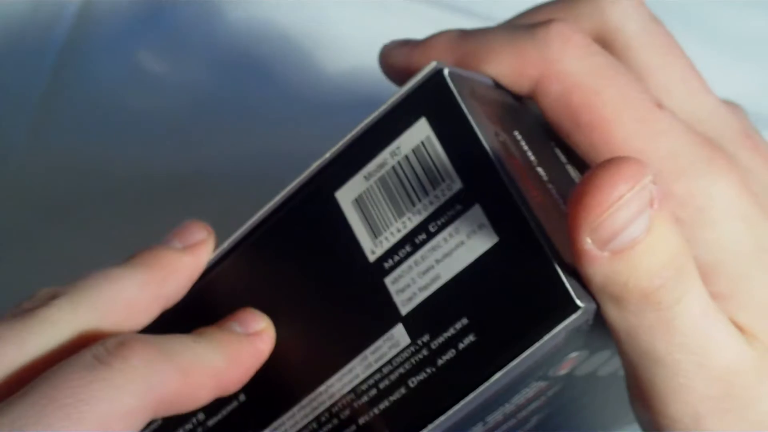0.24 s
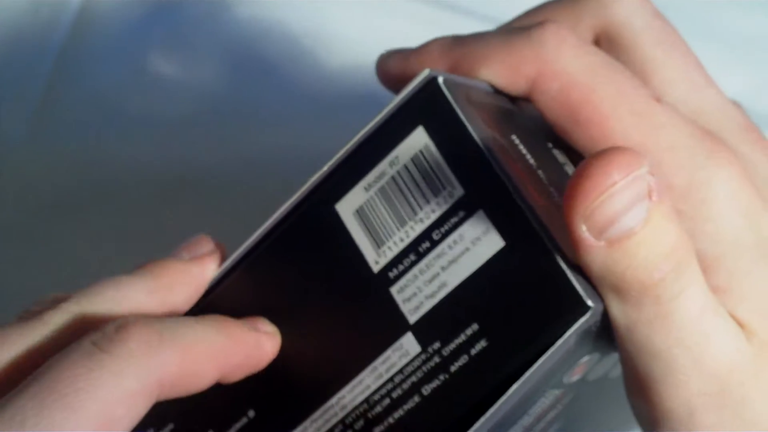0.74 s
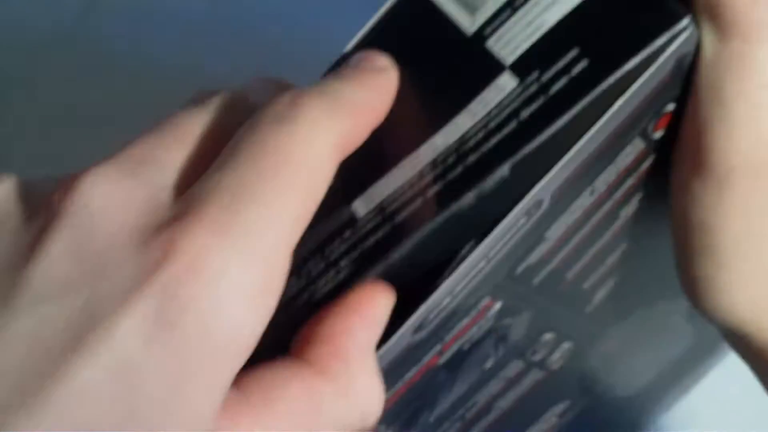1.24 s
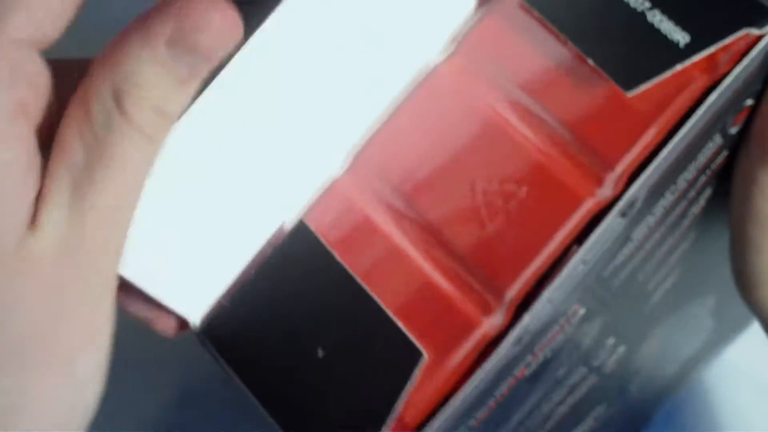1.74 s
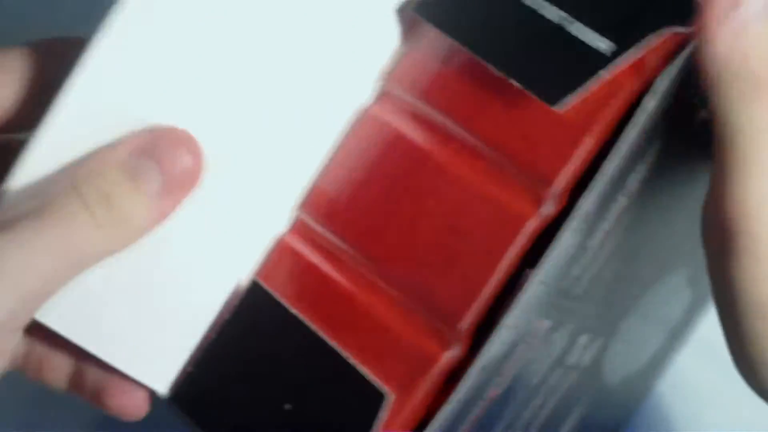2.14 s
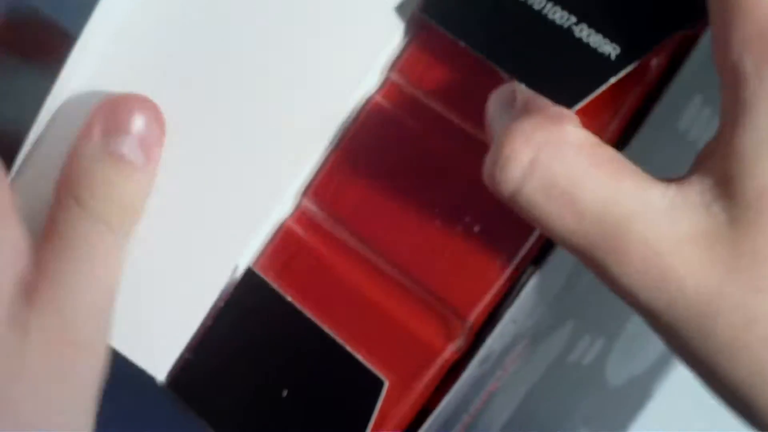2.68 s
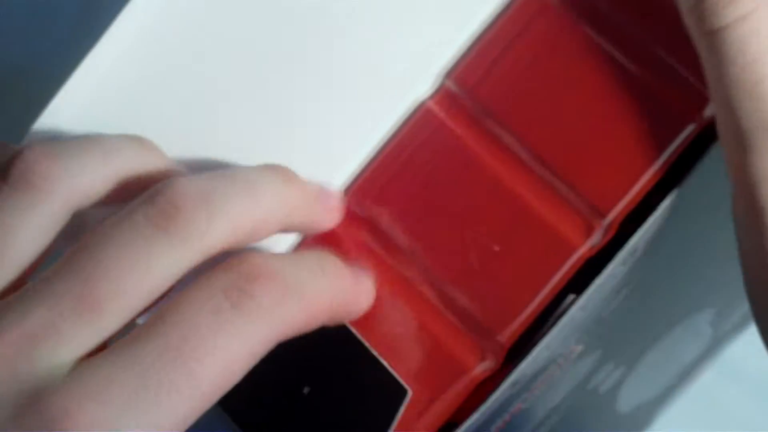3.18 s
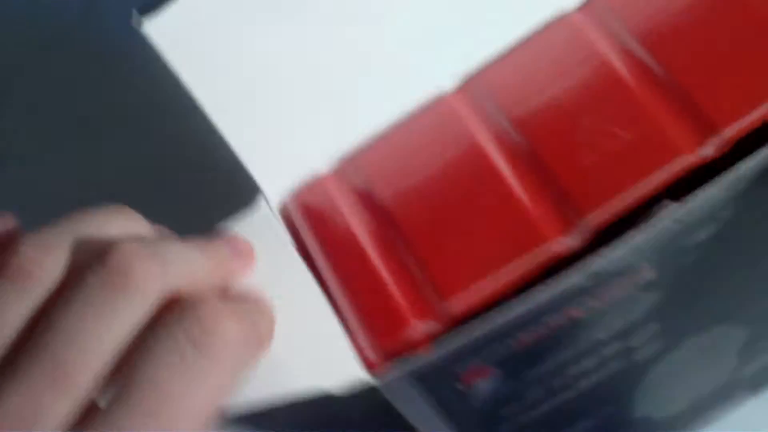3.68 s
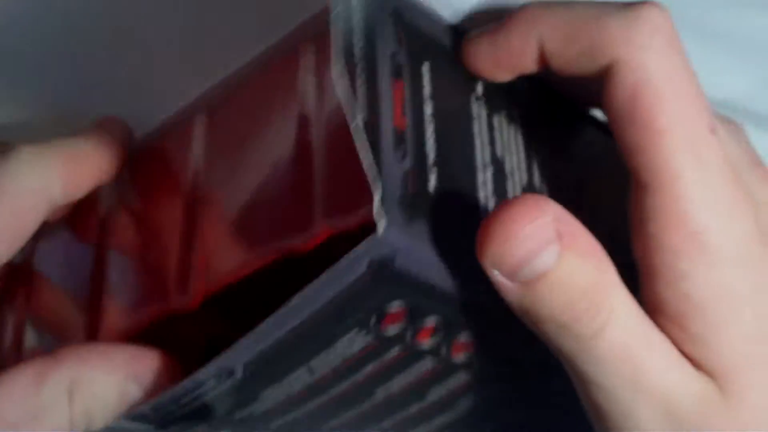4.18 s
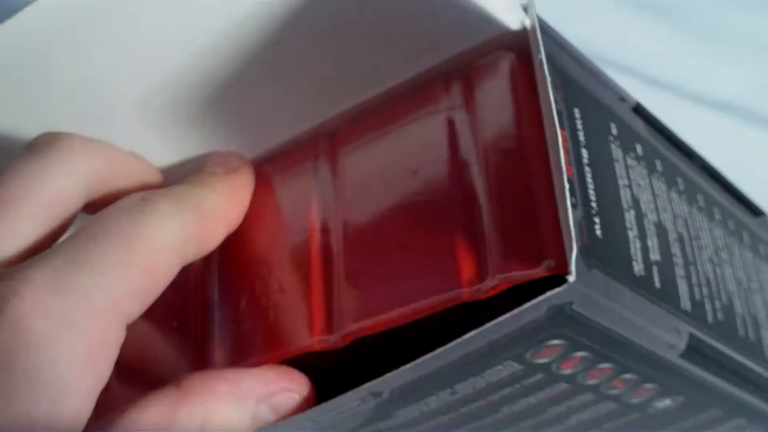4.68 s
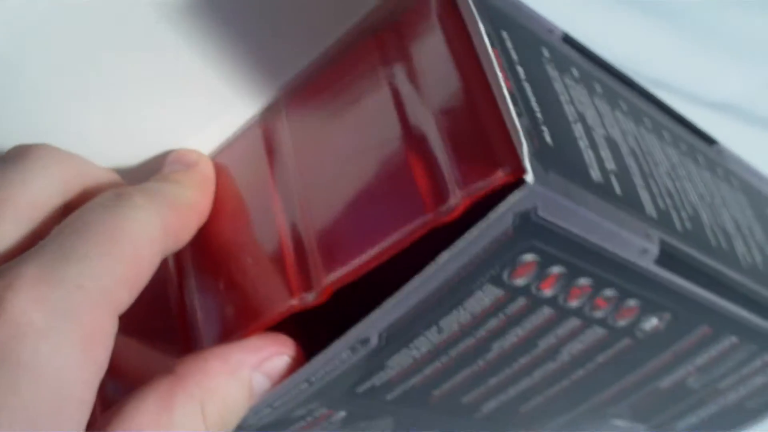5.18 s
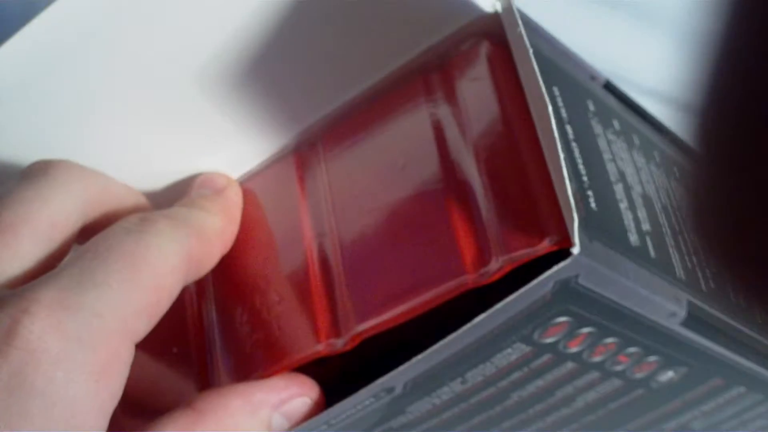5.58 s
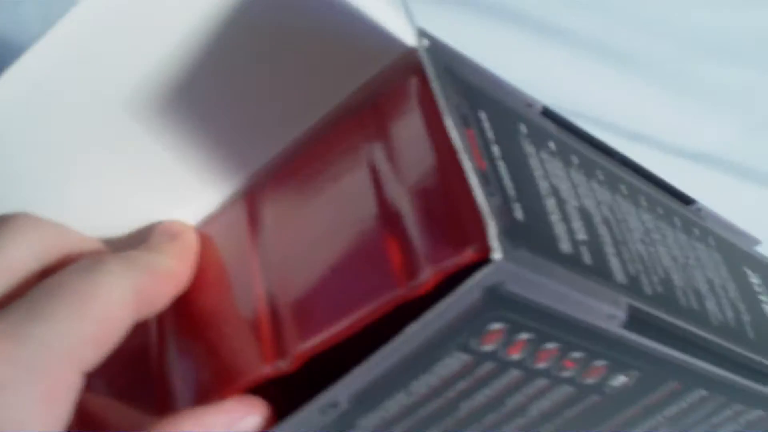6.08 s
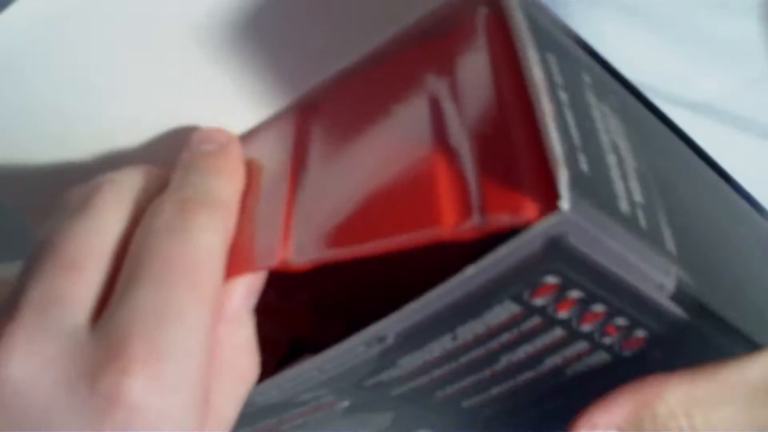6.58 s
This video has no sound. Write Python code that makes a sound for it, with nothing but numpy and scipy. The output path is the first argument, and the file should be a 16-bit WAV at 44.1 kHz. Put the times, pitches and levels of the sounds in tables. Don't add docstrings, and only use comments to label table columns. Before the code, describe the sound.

A quiet room with a faint bassy hum, heard by a small microphone very close to a cardboard box. From 0 to 1.1 s fingers rub softly, with hollow knocks near 0.45 and 0.6. At 1.25 a cluster of knocks and rough brushing begins; at 1.44 the flap slips free with a strong tick, thump and air puff. Around 2.1 comes a run of crisp crease ticks, a sharp click at 2.46, then presses, scrapes and puffs near 2.9. Between 3.4 and 3.6 there are knocks and a short glossy squeak; handling at 4.0 to 4.3 rasps and knocks. It calms until tiny plastic pops start at 5.0, growing at 5.5 and 5.9. Crackles lead to a hard pop at 6.07 and a hugely loud, dry, distorted snap at 6.11. Smaller pops follow at 6.3, fading to light crackles at 6.75 to 6.83.

```python
import sys
import numpy as np
from scipy import signal
from scipy.fft import rfft, irfft, next_fast_len
from scipy.io import wavfile
from scipy.ndimage import uniform_filter1d, map_coordinates

SR = 44100
rng = np.random.default_rng(int(sys.argv[2]) if len(sys.argv) > 2 else 0)


def int16_out(signal):
    q = np.round(np.clip(np.atleast_2d(signal).T, -1, 1) * 32767)
    wavfile.write(sys.argv[1], SR, q.astype(np.int16))


def linear_from_db(decibels):
    return 10 ** (np.asarray(decibels, float) / 20)


N = 301423

# [f/Hz, width/Hz, level/dB]
PANEL_MODES = [(60, 98, -1.5), (189, 140, -1), (354, 120, -2)]
# [f/Hz, width/Hz, level/dB]
EDGE_MODES = [(2250, 626, -0.5), (3670, 700, -4), (5060, 1300, -4)]
# [f/Hz, width/Hz, level/dB]
CRISP_MODES = [(6600, 1400, -1.5), (9750, 1400, 1.5), (13300, 2500, -10)]


def unit(x):
    return x / np.sqrt(np.mean(x ** 2) + 1e-20)


def along(points, hz):
    f, value = np.transpose(points)
    return np.interp(np.log(hz + 1), np.log(f + 1), value)


def filtered(x, response):
    length = x.shape[-1]
    size = next_fast_len(length + 4096)
    spectrum = rfft(x, size) * response(np.fft.rfftfreq(size, 1 / SR))
    return irfft(spectrum, size)[..., :length]


def peak(f, hz, width):
    return 1j * f * width / (hz * hz - f * f + 1j * f * width)


def body(modes):
    return lambda f: sum((-1) ** k * linear_from_db(db) * peak(f, hz, width) for k, (hz, width, db) in enumerate(modes))


def add(track, s, sound):
    part = track[round(s * SR):][:len(sound)]
    part += sound[:len(part)]


def room_air():
    # [f/Hz, density/dB per Hz]
    air_colour = [(12, -30), (20, -1), (86, -6.5), (187, -17.5), (357, -16), (388, -26.5), (472, -12),
                  (574, -17), (1480, -19), (2260, -22.5), (7730, -28.5), (13900, -32.5), (16000, -49.5)]
    return linear_from_db(-67) * unit(filtered(rng.standard_normal(N), lambda f: linear_from_db(along(air_colour, f))))


def room(x):
    # [f/Hz, t60/s]
    decay = [(200, 0.13), (900, 0.2), (4000, 0.099), (12000, 0.05)]
    hz, t, z = signal.stft(rng.standard_normal(SR // 3), SR, nperseg=256)
    fading = z * linear_from_db(-60 * t / along(decay, hz)[:, None])
    tail = signal.istft(fading, SR, nperseg=256)[1]
    delayed = np.pad(x, (200, 0))
    return signal.fftconvolve(delayed, tail / np.linalg.norm(tail))[:N]


def puffs():
    # [t/s, peak level/dB]
    puff_events = [
        (1.439, -38),
        (2.079, -58),
        (2.72, -52),
        (2.94, -41),
        (3.017, -47),
        (3.999, -50),
        (6.106, -40),
        (6.3, -54.5),
        (6.375, -54),
        (6.82, -44.5),
    ]
    u = np.arange(SR // 8) / SR / 0.0031
    track = np.zeros(N)
    for s, db in puff_events:
        add(track, s, linear_from_db(db + 6.5) * u * (2 - u) * np.exp(-u))
    return track


def creak():
    swell = np.exp(-((np.arange(N) / SR - .25) / 0.096) ** 2)

    def notes_of_box(f):
        return peak(f, 773, 32) ** 2 + linear_from_db(-9) * peak(f, 1143, 90) ** 2 + linear_from_db(-5) * peak(f, 375, 50) ** 2

    return linear_from_db(-61.5) * swell * unit(filtered(rng.standard_normal(N), notes_of_box))


def grit(per_s, spread_db, smooth):
    happens = rng.random(N) < per_s / SR
    size = linear_from_db(spread_db * np.minimum(rng.exponential(size=N), 3))
    slips = happens * size * rng.choice([-1, 1], N)
    clumps = map_coordinates(rng.standard_normal(400), [np.arange(N) * 45 / SR])
    return linear_from_db(2.5 * clumps) * (unit(slips) + smooth * rng.standard_normal(N))


def shares(pressure_db, speed_db):
    rest_db = -64
    over = pressure_db - rest_db
    panel = -3.5 + 0.42 * over
    hiss = -5 + 0.63 * over + speed_db
    return linear_from_db(rest_db + np.array([over, panel, over + speed_db, hiss]))


def rubbing():
    # [t/s, pressure level/dB, speed level/dB]
    grip = [(0, -54.5, -15), (.13, -67.5, -6), (.3, -66.5, -11), (.68, -63.5, -8), (.88, -73, -5),
            (1.2, -60, -5), (1.65, -75, -6), (2.05, -61, -8.5), (2.65, -65.5, -7.5), (3.25, -66, -5.5),
            (3.7, -70.5, 0), (4.33, -57.5, -9.5), (4.6, -69, -7.5), (5.12, -71.5, -6.5), (5.4, -70.5, -12),
            (5.9, -70, -6), (6.6, -70, -8.5), (6.83, -55, -12)]
    # [t/s, swell/s, fade/s, pressure level/dB, speed level/dB]
    strokes = [(1.27, 0.0054, 0.051, -47, -3), (1.41, 0.044, 0.15, -46, -5.5),
               (2.19, 0.051, 0.04, -56.5, 0), (2.48, 0.031, 0.038, -53, -8), (2.75, 0.042, 0.035, -50, -13),
               (2.89, 0.023, 0.036, -50.5, -2), (2.955, 0.011, 0.035, -51.5, -8.5),
               (3.04, 0.048, 0.053, -55.5, -13), (3.46, 0.077, 0.22, -56.5, -20),
               (3.82, 0.035, 0.074, -56, -12), (4.012, 0.0071, 0.037, -53, -9),
               (4.225, 0.013, 0.013, -47, -9), (4.287, .005, 0.0075, -46, -14),
               (4.75, 0.073, 0.033, -69.5, -24), (5.37, 0.034, 0.039, -69, -13),
               (6.08, 0.063, 0.02, -57, -2), (6.2, 0.056, 0.021, -59, -16),
               (6.31, 0.027, 0.032, -45, -28.5)]
    # [f/Hz, width/Hz, level/dB]
    cavity_modes = [(392, 210, -2.5), (861, 210, -.5), (1240, 340, -5.5)]
    panel_wakes_s = .06
    t = np.arange(N) / SR
    s, pressure_db, speed_db = np.transpose(grip)
    gains = shares(np.interp(t, s, pressure_db), np.interp(t, s, speed_db))
    for s, swell, fade, db, speed_db in strokes:
        gain = shares(db, speed_db) * [1, min(fade / panel_wakes_s, 1), 1, 1]
        shape = np.exp(-np.abs(t - s) / np.where(t < s, swell, fade))
        gains = gains + gain[:, None] * shape
    cavity, panel, rasp, hiss = gains
    mix = cavity * unit(filtered(grit(900, 1.9, 0.91), body(cavity_modes)))
    mix += panel * unit(filtered(grit(340, 2.6, 0.65), lambda f: body(PANEL_MODES)(f) * peak(f, 180, 530)))
    mix += rasp * unit(filtered(grit(1400, 3, .8), lambda f: body(EDGE_MODES)(f) * peak(f, 2000, 5500)))
    mix += hiss * unit(filtered(grit(2400, 2.8, 1.2),
                                lambda f: body(CRISP_MODES)(f) + linear_from_db(-9.5) * peak(f, 9000, 9000)))
    return mix


def rasps(rows, focus):
    t, track = np.arange(N) / SR, np.zeros(N)
    drive = grit(1500, 3, 0.9)
    for s, swell, fade, db, hz in rows:
        span = slice(round((s - .2) * SR), round((s + .3) * SR))
        since = t[span] - s
        shape = np.exp(-(since / np.where(since < 0, swell, fade)) ** 2)

        def colour(f):
            return peak(f, hz, focus * hz) ** 2 + linear_from_db(-14) * peak(f, hz, 1.1 * hz) * peak(f, hz, 3 * hz)

        track[span] += linear_from_db(db) * shape * unit(filtered(drive[span], colour))
    return track


def brushes():
    # [t/s, swell/s, fade/s, level/dB,
    # centre f/Hz]
    card_brushes = [(1.256, 0.0048, 0.013, -37.5, 1730), (1.257, 0.0044, 0.02, -41, 6700),
                    (1.268, 0.011, 0.022, -41, 4700), (1.278, .012, 0.05, -55.5, 3700),
                    (1.385, 0.038, 0.035, -52.5, 900), (1.485, 0.023, 0.035, -50, 710),
                    (1.49, .03, 0.043, -52, 1930), (1.48, 0.017, 0.02, -57, 6500),
                    (1.27, .01, 0.055, -44, 850), (1.31, 0.018, .03, -53, 2270),
                    (1.40, 0.085, 0.05, -51, 1800), (1.47, .015, 0.048, -49, 4700),
                    (1.67, .01, .06, -66.5, 2380), (2.15, 0.044, .08, -60, 6500),
                    (2.21, .03, .03, -62, 9500), (2.485, .015, 0.028, -61, 6000),
                    (2.62, 0.016, .03, -62, 8000), (2.9, 0.036, 0.02, -53, 900),
                    (2.96, .015, .02, -63, 2300), (2.962, .012, 0.02, -46, 760),
                    (3.11, .01, 0.036, -60, 1400), (1.912, 0.013, 0.018, -56, 4300),
                    (2.47, 0.027, 0.043, -59, 1890), (2.735, 0.024, 0.024, -51.5, 1700),
                    (2.89, 0.017, 0.016, -57, 7900), (2.89, 0.017, .03, -59, 3180),
                    (3.035, 0.016, 0.017, -55, 1500), (3.03, .015, 0.13, -64, 4500),
                    (3.385, 0.013, 0.024, -54.5, 1860), (3.47, .02, 0.045, -67, 1900),
                    (3.53, 0.035, 0.043, -61, 1700), (3.56, 0.046, .03, -70, 8300),
                    (4.15, .03, .03, -61, 2200), (3.812, 0.02, 0.028, -61, 6900),
                    (4.22, 0.02, 0.025, -58, 6300), (4.095, 0.0084, 0.011, -44, 840),
                    (4.225, 0.018, 0.023, -51, 1900), (4.23, 0.026, 0.026, -46, 795),
                    (4.28, .012, 0.011, -56.5, 4570), (4.35, .04, .03, -60, 2000),
                    (4.43, 0.044, 0.044, -60, 910), (4.72, 0.13, 0.074, -66, 1290)]
    # [t/s, swell/s, fade/s,
    # level/dB, centre f/Hz]
    tray_drags = [(5.365, 0.03, 0.042, -62, 2040), (5.38, .035, .04, -60.5, 1100),
                  (5.482, .004, .005, -55, 1000), (5.83, 0.044, .02, -56, 1100),
                  (5.57, .04, 0.074, -65, 2070), (5.57, 0.06, 0.12, -60.5, 1200),
                  (6.062, 0.0015, 0.003, -33.5, 1150), (6.09, .03, .015, -62.5, 8500),
                  (6.117, .004, 0.013, -35, 900), (6.13, .01, .025, -50, 950),
                  (6.284, 0.0046, 0.0074, -46.5, 1053), (6.435, .005, .012, -53, 1040),
                  (6.75, .03, .04, -54, 900)]
    return rasps(card_brushes + tray_drags, focus=.33)


def squeaks():
    # [t/s, swell/s, fade/s, level/dB, centre f/Hz]
    squeak_events = [(1.925, 0.027, 0.033, -61, 5100), (2.885, 0.0087, .015, -58, 8100),
                     (3.505, .015, 0.033, -58, 5160), (3.562, 0.014, 0.032, -53.5, 4000),
                     (3.58, .025, 0.03, -58, 5050), (3.59, 0.017, .015, -65, 3300),
                     (.49, 0.021, 0.054, -58.5, 415)]
    return rasps(squeak_events, focus=.16)


def flicks():
    # [t/s, peak level/dB, f/Hz, t60/s]
    card_flicks = [(.012, -48.5, 950, 0.037), (.186, -51, 1190, .02), (.42, -54, 400, 0.035),
                   (0.61, -35, 820, 0.023), (1.265, -38, 850, 0.036), (1.452, -30, 4400, 0.013),
                   (1.658, -50, 2400, 0.017), (1.743, -52, 2320, .02), (1.857, -48, 3710, .014),
                   (1.911, -42, 2220, 0.045), (2.077, -41, 1790, .012), (2.096, -48, 6800, .01),
                   (2.316, -51, 1810, .015), (2.385, -49, 2160, .015), (2.464, -34, 5000, 0.011),
                   (2.499, -47, 2010, .02), (2.595, -42, 6550, .012), (2.69, -47, 500, 0.017),
                   (2.701, -46, 900, .015), (2.875, -38, 2350, 0.018), (2.876, -41, 3430, .02),
                   (2.941, -44, 6600, .012), (3.018, -39, 4100, .014), (3.025, -42, 4500, 0.012),
                   (3.159, -51, 5500, .012), (3.19, -53, 1600, 0.011), (3.403, -49, 5000, 0.017),
                   (3.454, -47, 2010, 0.028), (3.57, -36.5, 3900, .014), (3.52, -46, 500, .02),
                   (3.536, -47, 350, 0.017), (3.801, -41, 6500, 0.014), (3.63, -53, 5100, .012),
                   (3.65, -49, 5200, .015), (3.697, -51, 1310, .015), (3.774, -50, 1300, .02),
                   (3.775, -51, 8500, .015), (3.9, -50, 8500, .015), (3.99, -48, 2500, .008),
                   (4.19, -47, 2010, .012), (4.277, -35, 1000, .02), (4.39, -52, 8900, .008),
                   (4.64, -55, 750, .02), (4.736, -53, 2100, .012), (4.84, -59, 1400, 0.013),
                   (.453, -40, 396, 0.016), (3.362, -40.5, 1920, 0.007), (3.377, -37, 1810, 0.011)]
    # [t/s, peak level/dB, f/Hz, t60/s]
    tray_flicks = [(5.533, -53, 8000, .008), (5.545, -56, 8000, .008), (5.797, -36.5, 6600, 0.013),
                   (5.88, -28, 786, .022), (5.941, -58, 10400, .008), (6.303, -28.5, 1585, 0.0092),
                   (6.342, -57, 4500, 0.0093), (6.418, -48, 900, .02), (6.826, -42, 900, 0.022),
                   (6.826, -51, 5500, .015), (5.798, -37.5, 3830, 0.012), (6.185, -43, 1810, 0.012),
                   (6.1058, -27, 6400, .006), (6.1058, -44.5, 12000, .005), (6.106, -20, 2000, .008),
                   (6.117, -30.5, 1900, .012), (6.187, -39, 1050, .012)]
    s, db, hz, t60 = np.transpose(card_flicks + tray_flicks)[..., None]
    t, track = np.arange(SR // 16) / SR, np.zeros(N)
    burst = rng.standard_normal((len(s), len(t))) * linear_from_db(-60 * t / t60) * (1 - np.exp(-t / .0005))
    sounds = filtered(burst, lambda f: peak(f, hz, 0.25 * hz) ** 2 + linear_from_db(-13) * peak(f, hz, 1.3 * hz) ** 2)
    sounds = linear_from_db(db) * sounds / np.abs(sounds).max(1, keepdims=True)
    for start, sound in zip(s[:, 0], sounds):
        add(track, start - .0004, sound)
    return track


def thumps():
    # [t/s, peak level/dB, f/Hz]
    thump_events = [(0.457, -31.5, 400), (1.254, -32, 395), (1.437, -25.5, 338), (2.084, -35, 192),
                    (2.875, -36.5, 275), (3.019, -34, 216), (3.377, -42.5, 196), (3.566, -44, 340),
                    (6.068, -38, 370), (6.108, -28.5, 322), (6.2, -51, 280), (6.312, -33.5, 320),
                    (6.362, -34.5, 350), (6.374, -42.5, 340), (6.819, -53, 166)]
    t, track = np.arange(SR // 5) / SR, np.zeros(N)
    attack = 1 - np.exp(-t / 0.0023)
    for s, db, hz in thump_events:
        add(track, s, linear_from_db(db + 2.0 - 60 * t / 0.066) * attack * np.sin(2 * np.pi * hz * t))
    return track


def contacts(rows, width, burst, rise, edge):
    s, db, hz, thump_db, click_db, tick_db = np.transpose(rows)
    note = hz[:, None]
    t = np.arange(SR // 5) / SR

    def push(t60, rise):
        return rng.standard_normal((len(s), len(t))) * linear_from_db(-60 * t / t60) * (1 - np.exp(-t / rise)) ** 2

    def cavity(f):
        steep = peak(f, note, 1000) / (1 + 1j * f / 2500) ** 2
        return (peak(f, note, width) + 0.12) * steep

    hollow = filtered(push(.6 * burst, rise / 3), cavity)
    thump = filtered(push(2.0 * burst, rise), lambda f: body(PANEL_MODES[1:])(f) * peak(f, 320, 420))
    click = filtered(push(1.1 * burst, rise), lambda f: body(edge)(f) * peak(f, 3000, 5500) ** 2)
    tick = filtered(push(0.4 * burst, rise), lambda f: body(CRISP_MODES)(f) * peak(f, 9000, 8000))
    parts = [(0, hollow), (thump_db + 0.1, thump), (click_db + 0.1, click), (tick_db + 0.1, tick)]
    sounds = sum(linear_from_db(db + rel)[:, None] * p / np.abs(p).max(1, keepdims=True) for rel, p in parts)
    track = np.zeros(N)
    for start, sound in zip(s, sounds):
        add(track, start - .0011, sound)
    return track


def card_contacts():
    # [t/s, peak level/dB, cavity f/Hz, panel level/dB, edge click level/dB]
    knocks = [(.079, -59, 770, -3, 1), (.453, -35.5, 1100, -3, -9), (.46, -28.5, 770, -13, -20),
              (.609, -39, 785, -1.5, -35), (.992, -43.5, 780, -10, -7), (1.004, -49, 820, -9, -4),
              (1.26, -29, 850, -5.5, 0.5), (1.285, -23, 810, -34, -5.5), (1.311, -35, 890, -17, 1.5),
              (1.714, -51.5, 1310, -10, -3), (2.746, -38, 886, -21, -21), (2.8485, -37, 1310, -9, -6.5),
              (2.944, -28.5, 750, -30, -19), (3.026, -43.5, 800, 1, 3.5), (3.361, -39, 1100, -10, -18),
              (3.393, -36, 890, -15, -10), (3.454, -44.5, 910, -20, -11), (3.5, -41.5, 869, -10, -9),
              (3.848, -45, 870, -10, -8), (3.99, -45.5, 700, -5, -17), (4.082, -34.5, 787, -17, -6.5),
              (4.241, -35, 790, -31, -17), (4.283, -35.5, 840, -29, -14), (4.508, -50.5, 700, -20, -2)]
    # [t/s, peak level/dB, sharpness level/dB]
    presses = [(1.183, -47.5, -3), (1.251, -29.5, -13), (1.434, -30, -13), (2.055, -45, -4),
               (2.077, -45.5, -13), (2.084, -46, -9), (2.095, -50, -5), (2.269, -45, -22), (2.714, -44, -3),
               (2.879, -35.5, -7), (2.937, -39, -1), (3.018, -47.5, -9), (3.098, -46, -8),
               (3.14, -49.5, -3), (3.161, -59, 1), (3.192, -58, -18), (3.242, -52, 2), (3.571, -47.5, -7),
               (3.629, -47, -5), (3.801, -44.5, -1), (4.008, -45.5, 4)]
    # [t/s, peak level/dB, sharpness level/dB]
    ticks = [(.582, -50, -8), (1.053, -50, 0), (1.072, -57, 1), (1.099, -49.5, -5), (1.12, -58, 5),
             (1.157, -52, 0), (1.44, -18, -12.5), (1.453, -19.5, -11), (1.66, -53.5, -9), (1.83, -47, 0.5),
             (1.858, -43.5, -9), (1.913, -48, -6), (2.111, -41, 9), (2.1145, -44, 13), (2.1435, -40, 5),
             (2.1665, -38, 10.5), (2.181, -42.5, 2), (2.194, -40.5, 9.5), (2.379, -55.5, 1.5),
             (2.451, -46, -3), (2.465, -33.5, -15), (2.489, -37, -19), (2.549, -45.5, 3), (2.597, -38, -2),
             (2.954, -45, -3), (3.376, -35.5, -15.5), (3.733, -50, -6), (4.217, -35, -13.5),
             (4.389, -51, -4)]

    def sharp(events, panel_db):
        rows = []
        for s, db, sharpness in events:
            note = 829 + 49 * rng.standard_normal()
            edge_db = -1 + 0.45 * sharpness
            rows.append((s, db, note, panel_db, edge_db, sharpness))
        return rows

    rows = [tuple(knock) + (-28,) for knock in knocks]
    rows += sharp(presses, panel_db=-0.2) + sharp(ticks, panel_db=-16.5)
    return contacts(rows, width=114, burst=0.016, rise=0.002, edge=EDGE_MODES)


def tray_contacts():
    # [t/s, peak level/dB, pitch f/Hz, wall click level/dB]
    pops = [(5.015, -50.5, 750, -20), (5.063, -51, 1230, -20), (5.127, -49.5, 856, -17),
            (5.232, -39.5, 1040, -33), (5.507, -29.5, 1050, -6), (5.622, -38, 1090, -2.5),
            (5.835, -35.5, 690, -11), (5.879, -26, 754, -25), (6.066, -10.5, 955, -27),
            (6.0785, -21, 980, -27), (6.185, -35.5, 724, -9), (6.253, -47.5, 940, -0.5),
            (6.279, -35, 1030, -25), (6.304, -14, 1070, -42.5), (6.31, -18.5, 907, -28),
            (6.317, -22, 744, -32), (6.343, -32.5, 740, -6), (6.361, -32, 754, -16),
            (6.372, -30, 746, -7.5), (6.381, -37, 1280, -12), (6.433, -42, 1040, -30),
            (6.737, -45.5, 694, -6), (6.746, -40, 861, -2.5), (6.771, -44, 907, -5.5)]
    # [t/s, peak level/dB, pitch f/Hz, sharpness level/dB]
    crackles = [(5.477, -51, 1100, -19), (5.516, -35.5, 840, -19), (5.524, -42, 1050, -3),
                (5.786, -45, 950, 0), (5.796, -31, 1070, -10), (5.801, -41, 1090, -9),
                (5.867, -49, 1170, -3), (5.997, -41.5, 750, -5), (6.008, -43.5, 829, 0.5),
                (6.018, -35, 1080, -4), (6.032, -32, 780, -14), (6.716, -47, 805, -7),
                (6.819, -41.5, 786, -13.5)]
    # [f/Hz, width/Hz, level/dB]
    shell_modes = [(1700, 610, 2), (2600, 790, -2), (4500, 2800, -13.5)]
    rows = []
    for s, db, hz, edge_db in pops:
        purer = .26 * (db + 34)
        rows.append((s, db, hz, -24.5 - purer, edge_db, -35 - purer))
    for s, db, hz, sharpness in crackles:
        rows.append((s, db, hz, -20.5, 0.34 * sharpness, sharpness))
    return contacts(rows, width=220, burst=0.011, rise=0.00089, edge=shell_modes)


def snap():
    # [t/s, peak level/dB, crack length/s]
    snap_event = (6.1086, 5, 0.0032)
    # [f/Hz, density/dB per Hz]
    crack_colour = [(35, -49), (60, -20), (281, -13), (480, -39), (1010, -10), (2190, -15.5), (2410, -4),
                    (2970, -15), (3420, -8), (5330, -13), (5860, -21), (6430, -8), (7940, -10.5),
                    (9600, -26), (12100, -27.5), (16000, -49.5)]
    # [f/Hz, level/dB, t60/s]
    shell_ring = [(745, 3, 0.035), (1005, 4, .04), (1080, 20.5, .016), (1500, 10, .012), (1250, 12.5, .018),
                  (1805, 0.5, 0.015), (1997, -1.5, 0.032), (2450, -21, .07), (3490, -27, 0.12),
                  (4000, -16, .05), (4320, -18.5, 0.054), (6350, -25, .04), (7380, -19.5, 0.065)]
    s, db, length = snap_event
    lead = 200
    t = np.arange(SR // 4) / SR
    shape = (1 - np.exp(-t / 0.00024)) * linear_from_db(-60 * np.maximum(t - length, 0) / 0.0048)
    tear = rfft(np.roll(shape * rng.standard_normal(len(t)), lead))
    even = tear / np.sqrt(uniform_filter1d(np.abs(tear) ** 2, size=80))
    crack = filtered(irfft(even, len(t)), lambda f: linear_from_db(along(crack_colour, f)))
    t = np.maximum(t - lead / SR, 0)
    crack *= 1 - np.exp(-t / 0.00034)
    crack /= np.abs(crack).max()
    ring = sum(linear_from_db(level - 60 * t / t60) * np.sin(2 * np.pi * hz * t) for hz, level, t60 in shell_ring)
    ring = ring * (1 - np.exp(-t / .0011))
    giving = filtered(crack, lambda f: 1 / (1 + 1j * f / 2500))
    track = np.zeros(N)
    s -= lead / SR
    add(track, s - .003, linear_from_db(db - 23.5) * giving)
    add(track, s, linear_from_db(db + 2.0) * crack + linear_from_db(db - 18.0) * ring)
    return track


def scene():
    card = thumps() + card_contacts()
    tray = tray_contacts()
    crack = snap()
    reflections = linear_from_db(-10.5) * room(card) + linear_from_db(-23.0) * room(tray) + linear_from_db(-44) * room(crack)
    friction = rubbing() + brushes() + squeaks() + creak()
    mix = room_air() + puffs() + friction + flicks() + card + tray + crack + reflections
    return mix[None]


def band_limit(x):
    return signal.sosfilt(signal.butter(12, 16220, fs=SR, output="sos"), x)


def record(dry):
    ceiling = .86
    heard = filtered(dry, lambda f: linear_from_db(np.interp(f, [10500, 15000, 16500], [0, -4, -40])))
    lost = np.clip(heard, -ceiling, ceiling) - heard
    lost = filtered(lost, lambda f: f ** 2 / (f ** 2 + 600 ** 2))
    lost = lost - filtered(lost, lambda f: np.clip((f - 9000) / 5000, 0, .55))
    kept = filtered(heard + lost, lambda f: np.clip((16150 - f) / 400, 0, 1))
    return band_limit(kept)


dry = scene()
out = record(dry)
int16_out(out)
```